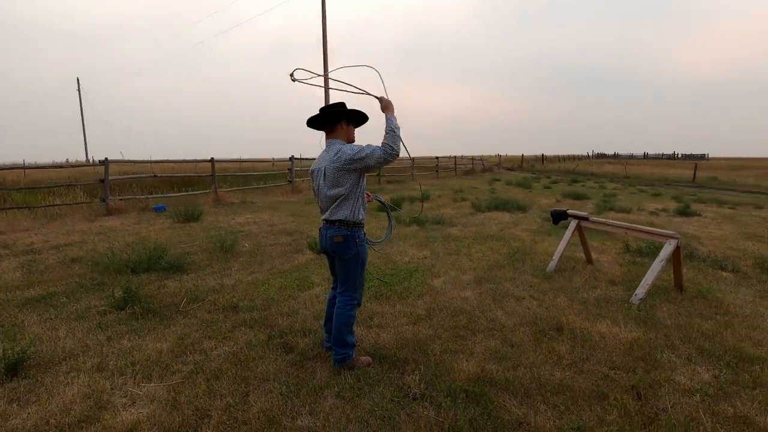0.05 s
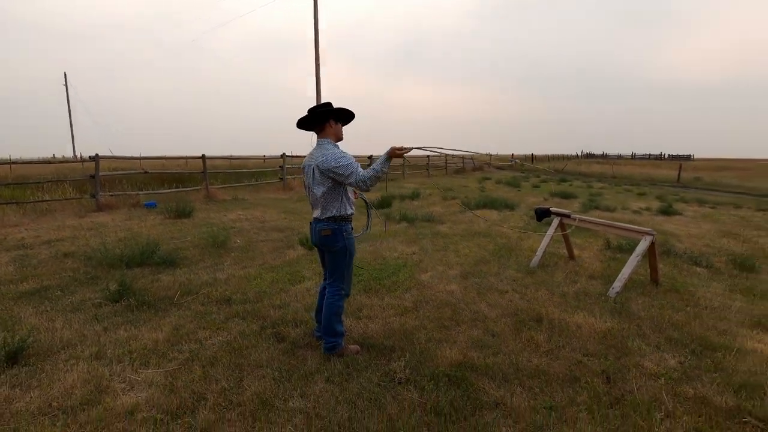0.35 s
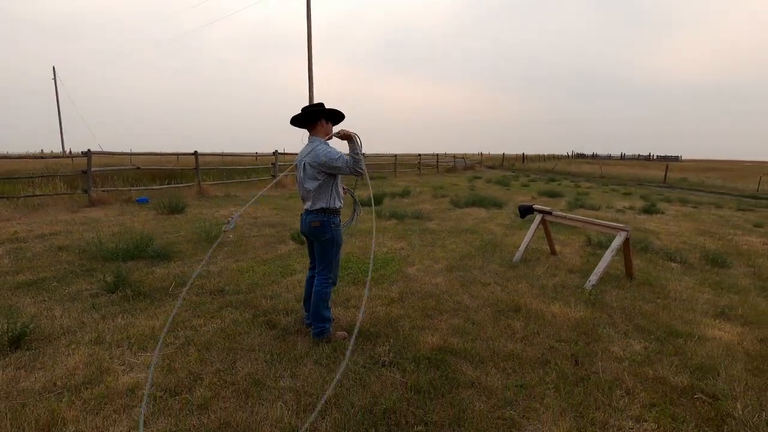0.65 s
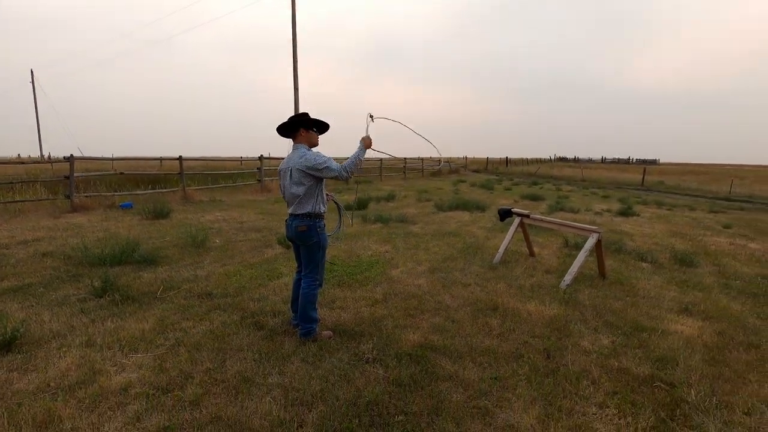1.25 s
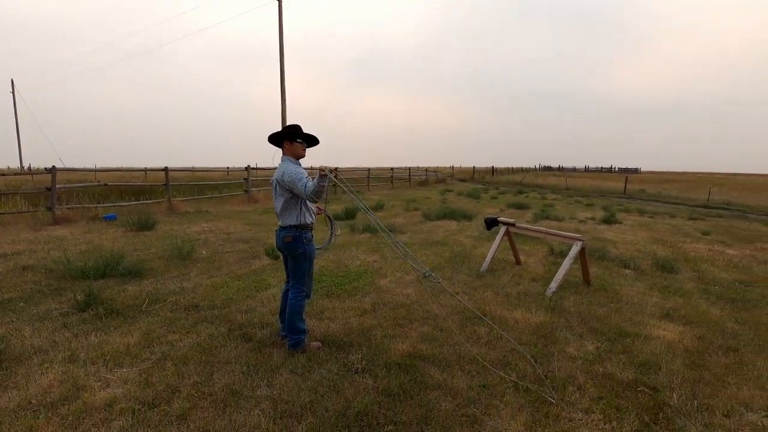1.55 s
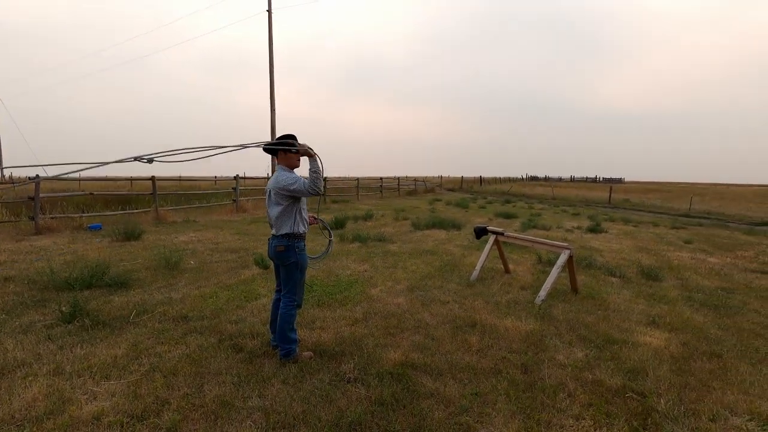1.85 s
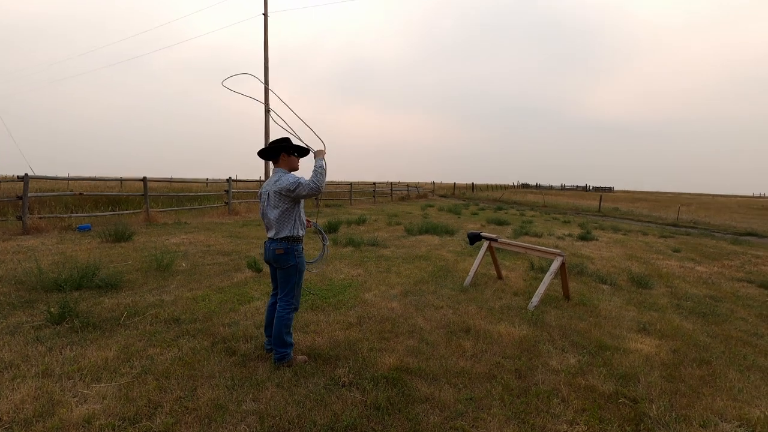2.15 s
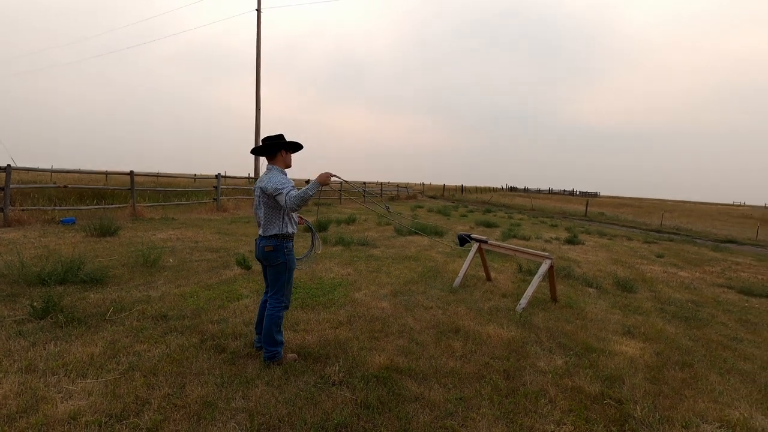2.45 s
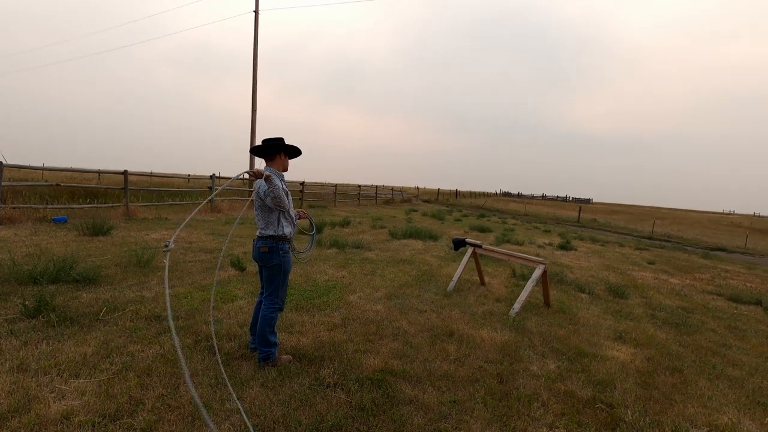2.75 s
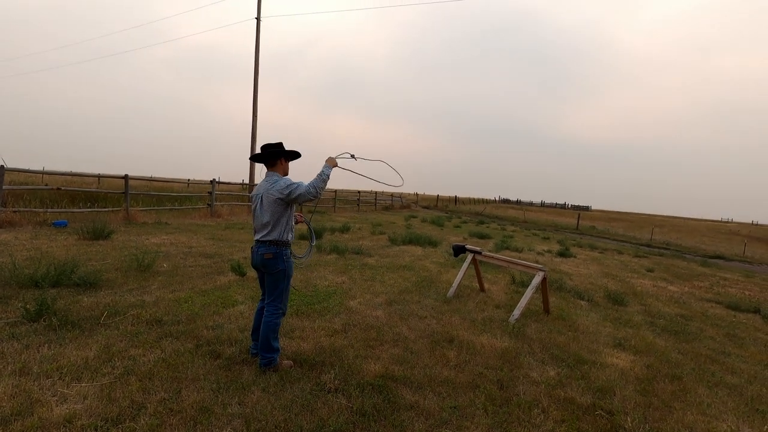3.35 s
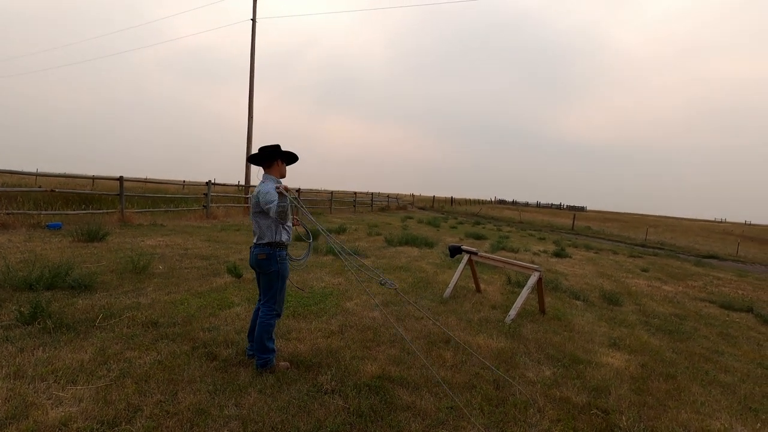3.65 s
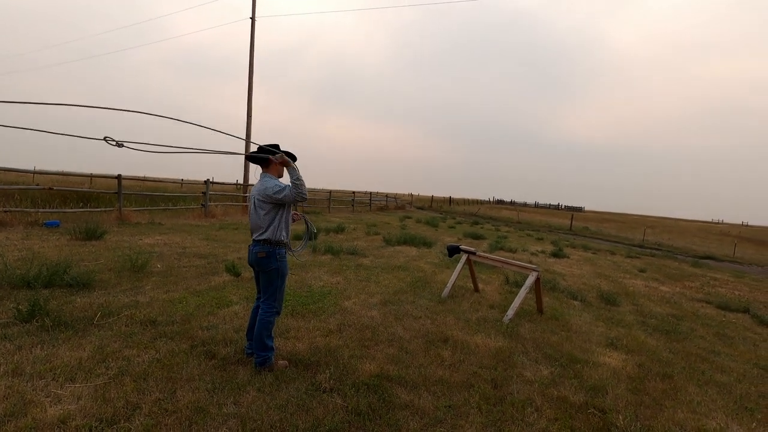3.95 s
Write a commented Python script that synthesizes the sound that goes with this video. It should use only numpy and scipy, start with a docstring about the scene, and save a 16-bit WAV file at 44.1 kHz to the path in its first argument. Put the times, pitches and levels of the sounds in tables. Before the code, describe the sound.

A lasso whooshes round in circles, brushing dry grass twice, with wind on the microphone.

```python
"""Lasso over a dry field

A lasso swings in wide circles a few metres from a small stereo microphone. Its strands hum as they shed
vortices and hiss through the air, the loop twice sweeps the grass, and the rope ticks, rubs and crackles
in the hand. Wind rumbles and buffets on the two microphone ports, over a faint field hiss."""
import sys
import numpy as np
from scipy import signal
from scipy.fft import rfft, irfft
from scipy.io import wavfile
from scipy.ndimage import uniform_filter1d

SR = 44100
rng = np.random.default_rng(int(sys.argv[2]) if len(sys.argv) > 2 else 0)


def transcribe(signal):
    """Save signal, clipped to [-1, 1], as a 16-bit WAV file at the path in sys.argv[1]."""
    frames = np.atleast_2d(signal).T
    limited = np.clip(frames, -1, 1)
    pcm = np.round(limited * 32767).astype(np.int16)
    wavfile.write(sys.argv[1], SR, pcm)


N = 176400
T = np.arange(N) / SR
F = np.maximum(np.arange(N // 2 + 1) * SR / N, 1)


def undb(db):
    """Decibels to gain."""
    return 10 ** (np.asarray(db) / 20)


def unit(x):
    """Scale to rms 1."""
    return x / np.sqrt(np.mean(x ** 2))


def curve(rows, column=1):
    """One column of a table, joined by straight lines in time."""
    rows = np.array(rows)
    return np.interp(T, rows[:, 0], rows[:, column])


def colour(x, rows, column=1):
    """Equalise a sound through (Hz, dB) points."""
    rows = np.array(rows)
    gain_db = np.interp(np.log(F), np.log(rows[:, 0]), rows[:, column])
    return irfft(rfft(x) * undb(gain_db), N)


def pair(x, likeness):
    """Mix two unrelated sounds into a left and right that are partly alike."""
    mid = np.sqrt(1 + likeness) * x[0]
    side = np.sqrt(1 - likeness) * x[1]
    return np.array([mid + side, mid - side]) / np.sqrt(2)


def noise(likeness):
    """White stereo noise."""
    return pair(rng.standard_normal((2, N)), likeness)


def place(x, pan_db, lag_s=4e-5):
    """The left port hears the sound pan_db louder and a little later than the right."""
    left, right = x * undb([[pan_db / 2], [-pan_db / 2]])
    return np.array([irfft(rfft(left) * np.exp(-2j * np.pi * F * lag_s), N), right])


def steady(x, seconds):
    """Even out the slow chance swells of a noise."""
    return x / np.sqrt(uniform_filter1d(abs(x) ** 2, int(seconds * SR)) + 1e-12)


def whistle(hz, width_hz):
    """A tone of wandering phase and strength around a pitch; at 0 Hz, a random wobble."""
    real, imag = irfft(rfft(rng.standard_normal((2, N))) / np.sqrt(1 + (F / width_hz) ** 4), N)
    wander = steady(real + 1j * imag, seconds=0.08)
    phase = 2 * np.pi * np.cumsum(np.broadcast_to(hz, N)) / SR
    return np.sqrt(2) * (wander * np.exp(1j * phase)).real


def grains(per_s, spread_db):
    """Two unrelated streams of tiny clicks of uneven size."""
    hits = rng.random((2, N)) < per_s / SR
    clicks = hits * rng.standard_normal((2, N))
    return unit(clicks * undb(spread_db * np.minimum(rng.exponential(size=(2, N)), 5)))


def field():
    """Distant open air, a fine high hiss and a faint fluttering buzz, like an insect's."""
    # Tone of the air and of the hiss. Each row: frequency in Hz, gain in dB.
    air_colour = [(100, 9.5), (300, 18), (500, 6.5), (800, -0.5), (1200, 4.5), (1800, -15.5), (3000, -22),
                  (6000, -17.5), (10000, -17), (15000, -30.5)]
    hiss_colour = [(1000, -31), (3000, -4), (5000, 5.5), (7400, 5.5), (8300, 3.5), (9500, 2.5),
                   (11000, -1.5), (12500, -7.5), (14000, -12.5)]
    # Swells of the hiss and of the buzz. Each row: time in seconds, level in dB.
    hiss_level = [(0, -79), (.3, -76), (.38, -80), (.6, -79), (1.12, -71.5), (1.3, -80), (1.6, -79),
                  (2.1, -77.5), (2.4, -80), (2.9, -77), (3.1, -92), (4, -95.5)]
    buzz_level = [(1.2, -88.5), (2.3, -82), (2.66, -78), (2.71, -102)]
    air = unit(colour(noise(likeness=0.53), air_colour)) * undb(-69)
    hiss = unit(colour(noise(likeness=0.17), hiss_colour)) * undb(curve(hiss_level))
    throb = 1 + 0.27 * whistle(hz=71, width_hz=71)
    buzz = pair([whistle(hz=11800, width_hz=1150) for _ in range(2)], likeness=0.3)
    return air + place(hiss, pan_db=1) + buzz * throb * undb(curve(buzz_level))


def wind(flutter_db=2):
    """Turbulence rumbles on each port by itself, and flutters on both together."""
    # Swells of the wind. Each row: time in seconds, left and right level in dB.
    swells = [(0, -16.5, -44), (.2, -65, -21.5), (.32, -20.5, -30.5), (.43, -32, -30.5), (.58, -27.5, -24),
              (.71, -33.5, -38), (.9, -23, -28.5), (1.15, -34.5, -27.5), (1.28, -35, -37),
              (1.4, -29.5, -48), (1.58, -39, -33.5), (1.72, -37.5, -34), (1.93, -28.5, -44),
              (2.02, -40.5, -42), (2.12, -42.5, -38), (2.3, -34, -30), (2.4, -49.5, -48),
              (2.66, -40.5, -46.5), (2.77, -28, -50), (2.84, -36.5, -46), (3.0, -40.5, -57),
              (3.16, -22, -34), (3.33, -39, -42), (3.48, -24, -37), (3.72, -32, -32), (3.87, -26, -19),
              (4, -49, -41.5)]
    # Tone of the rumble. Each row: frequency in Hz, gain in dB.
    rumble_colour = [(10, -39.5), (25, -2), (42, 3), (80, -4), (125, -12.5), (180, -19.5), (260, -32),
                     (400, -48.5), (800, -93.5)]
    level_db = np.array([curve(swells, column=1), curve(swells, column=2)])
    level_db += flutter_db * whistle(hz=0, width_hz=8)
    rumble = steady(colour(noise(likeness=0), rumble_colour), seconds=0.23)
    return rumble * undb(level_db)


def eddies(size=8192):
    """Eddies strike the ports as low thuds: each a slow body around a shorter, brighter core."""
    # Buffets of wind. Each row: centre and half-width in seconds, left and right gain in dB,
    # corner in Hz. Body and core each scale the width, gains and corner.
    buffets = [(0.172, 0.0038, -12.5, -16.5, 211), (0.196, 0.0052, -10, -39, 188),
               (0.219, 0.0073, -21, -20, 347), (0.243, 0.0089, -16.5, -25, 176),
               (0.273, 0.0075, -20.5, -21, 170), (0.313, 0.024, -28.5, -21, 246),
               (0.351, 0.003, -17.5, -22, 252), (.374, 0.026, -36.5, -26.5, 237),
               (0.424, 0.012, -51, -30, 191), (0.523, 0.016, -39, -14.5, 208),
               (0.921, 0.026, -43, -19, 229), (1.05, 0.0075, -36.5, -16.5, 273.6),
               (1.084, 0.0088, -36, -15.5, 270), (1.179, 0.0062, -18, -28, 179),
               (1.407, 0.0022, -28, -29, 201), (2.098, 0.0065, -40.5, -24.5, 187.1),
               (2.305, 0.016, -36.5, -35.5, 131), (2.772, 0.0074, -22, -57, 70.57),
               (3.128, 0.0037, -13.5, -26.5, 215.1), (3.149, 0.007, -9.5, -33.5, 120),
               (3.186, 0.018, -36.5, -34, 230), (3.476, 0.006, -29.5, -27.5, 249),
               (3.532, 0.011, -20.5, -26, 152.5), (3.588, .012, -41, -25, 184),
               (3.65, 0.035, -28, -32, 137.8), (3.78, 0.022, -37, -24, 179.4),
               (3.853, 0.011, -32.5, -17, 221.2), (3.871, 0.015, -31.5, -16, 225),
               (3.92, 0.015, -21, -16, 196), (3.984, 0.013, -26, -25.5, 205)]
    out = np.zeros((2, N + 2 * size))
    t = (np.arange(size) - size // 2) / SR
    f = np.arange(size // 2 + 1) * SR / size

    def puff(half_width_s, corner_hz):
        """A bell-shaped burst of turbulence that falls away above its corner."""
        envelope = np.exp(-0.5 * (t / half_width_s) ** 2)
        burst = pair(rng.standard_normal((2, size)), likeness=0.33) * envelope
        low_cut = f / np.hypot(f, 0.24 * corner_hz)
        high_cut = np.exp(-(f / corner_hz) ** 1.79)
        thud = irfft(rfft(burst) * low_cut * high_cut)
        return thud * np.sqrt(np.sum(envelope ** 2) / np.sum(thud ** 2, axis=1, keepdims=True))

    for at, half_width_s, left_db, right_db, corner_hz in buffets:
        body = undb(-2) * puff(half_width_s, 0.78 * corner_hz)
        core = undb(-0.5) * puff(0.27 * half_width_s, 1.065 * corner_hz)
        i = int(at * SR) + size // 2
        out[:, i:i + size] += (body + core) * undb([[left_db], [right_db]])
    return out[:, size:size + N]


def squeak(at_s=0.084, half_width_s=0.026):
    """The rope slips briefly against itself."""
    envelope = np.exp(-((T - at_s) / half_width_s) ** 2)
    return place(whistle(hz=1880, width_hz=48) * envelope * undb(-63.5), pan_db=1)


def scrapes(half_band_octaves=0.71):
    """The rope slides through the hand in short, soft rubs."""
    # Rubs in the hand. Each row: centre and half-width in seconds, level in dB, band centre in Hz.
    rubs = [(.43, 0.019, -68, 2190), (1.027, 0.0075, -67.5, 1430), (1.109, .009, -60.5, 1160),
            (1.167, 0.0077, -70.5, 3310), (2.456, 0.012, -72, 1720), (3.139, 0.021, -72, 2296)]
    out = np.zeros(N)
    for at, half_width_s, db, hz in rubs:
        band = 1 / (1 + (np.log2(F / hz) / half_band_octaves) ** 4)
        friction = unit(irfft(rfft(rng.standard_normal(N)) * band, N))
        out += friction * undb(db) * np.exp(-((T - at) / half_width_s) ** 2)
    return place(out, pan_db=7)


def crackle(start_s=1.87, length_s=0.57, count=28, size=256):
    """While the loop twists, dry fibres snap one by one, each with its own pitch and strength."""
    low_hz, high_hz, decay_cycles = 2650, 13010, 1.4
    out, t = np.zeros(N), T[:size]
    for k, (jitter, pitch, softness) in enumerate(rng.random((count, 3))):
        hz = low_hz * (high_hz / low_hz) ** pitch
        snap = np.sin(2 * np.pi * hz * t) * np.exp(-t * hz / decay_cycles)
        i = int((start_s + length_s * (k + jitter) / count) * SR)
        out[i:i + size] += undb(-53 - 11 * softness) * snap
    return place(out, pan_db=16.5)


def ticks(knock_hz=786, top_hz=8000, boost_db=4, size=4096):
    """Short dry cracks in one broad resonance, over a dull knock of the stiff rope."""
    # Ticks of the rope. Each row: start in seconds, peak in dB before the boost and panning,
    # decay in seconds, resonance in Hz.
    cracks = [(.088, -53, 0.0015, 1370), (0.1951, -51, 0.0053, 790), (0.3293, -56, 0.0011, 2480),
              (0.5881, -53, 0.00063, 2900), (0.709, -59, 0.0021, 3400), (1.8178, -59.5, 0.0007, 3500),
              (2.011, -58.5, 0.00097, 2378), (2.0563, -55, 0.0008, 2300), (2.0991, -54.5, 0.0012, 2000),
              (2.1852, -55.5, 0.0017, 2460), (2.2725, -53.5, 0.00078, 1030)]
    out = np.zeros(N)
    for start, db, decay, hz in cracks:
        burst = rng.standard_normal(size) * np.exp(-T[:size] / decay)
        ring = signal.lfilter(*signal.iirpeak(hz, Q=3, fs=SR), burst)
        knock = signal.lfilter(*signal.iirpeak(knock_hz, Q=3, fs=SR), burst)
        tick = signal.lfilter(*signal.butter(1, top_hz, fs=SR), ring + undb(1) * knock)
        i = int(start * SR)
        out[i:i + size] += undb(db + boost_db) * tick / abs(tick).max()
    return place(out, pan_db=8.5)


def grass(sag_db_per_s=49, release_s=0.0096, tail_s=0.074, tail_db=-11.5):
    """The loop flicks thousands of dry stalks a second, and they settle behind it."""
    # Passes through the grass. Each row: start and hold in seconds, gain in dB, attack in seconds.
    sweeps = [(1.639, 0.035, -47.5, 0.035), (2.711, 0.053, -48, 0.017)]
    # Tone of the stalks. Each row: frequency in Hz, left and right gain in dB.
    stalk_colour = [(202.9, 3.5, 11.5), (545, -4.5, -3), (1000, -8.5, -4), (1790, -5.5, -4.5),
                    (3320, -1, 0), (5170, -3, -1.5), (6548, -7.5, -5), (7800, -5, -20), (8400, -14, -8),
                    (8700, -6, 1.5), (10060, -13, -2), (11200, -18, -6), (12900, -18, -12),
                    (15500, -26.5, -20)]
    envelope = np.zeros(N)
    for start, hold, db, attack in sweeps:
        age = np.maximum(T - start, 0)
        rise = np.minimum(age / attack, 1)
        sag_db = sag_db_per_s * np.clip(age - attack, 0, hold)
        after = np.maximum(age - attack - hold, 0)
        release = np.exp(-after / release_s) + undb(tail_db) * np.exp(-after / tail_s)
        envelope += undb(db - sag_db) * rise * release
    left, right = pair(grains(per_s=4200, spread_db=1.5), likeness=0.85)
    rustle = np.array([colour(left, stalk_colour, column=1), colour(right, stalk_colour, column=2)])
    return place(unit(rustle) * envelope, pan_db=1.5)


def rope_rush():
    """Air rushes past the rope in a broad hiss on each swing, roughened by the twisted strands."""
    # Swells of the rush. Each row: time in seconds, level in dB.
    rush_level = [(0, -65), (.08, -62.5), (.22, -69.5), (.38, -71), (.47, -66), (.57, -59), (.68, -62.5),
                  (.77, -67), (1.08, -67.5), (1.25, -72), (1.62, -70), (1.72, -59.5), (1.82, -68.5),
                  (2.02, -64), (2.2, -66), (2.4, -70.5), (2.68, -72.5), (2.82, -65.5), (2.9, -61.5),
                  (3.02, -73), (3.35, -76.5), (3.74, -74), (3.89, -61), (3.96, -68), (4, -73)]
    # Tone of the rush. Each row: frequency in Hz, gain in dB.
    rush_colour = [(200, 6.5), (500, 5.5), (800, -2), (1300, 2), (2600, -2.5), (4000, -7), (7000, -12.5),
                   (10000, -19.5), (15000, -45)]
    air = noise(likeness=0.45)
    creaks = undb(-5.5) * pair(grains(per_s=600, spread_db=4.5), likeness=0.71)
    rush = unit(colour(air + creaks, rush_colour))
    return place(rush * undb(curve(rush_level)), pan_db=2)


def rope_hum(cruise_hz=254, octave_db_per_hz=0.1054):
    """Vortices shed by the fast tip and the slower inner strands, with a weak octave from drag."""
    # The tip's speed sets the pitch of its vortices. Each row: time in seconds, pitch in Hz.
    tip_pitch = [(0, 254.7), (.14, 215), (.45, 249.8), (.6, 338.8), (.67, 316.8), (.78, 179.1),
                 (.81, 250.2), (.95, 195), (1.55, 304), (1.67, 312.5), (1.75, 215), (1.82, 152.3),
                 (1.87, 220.7), (1.99, 216.8), (2.1, 295.3), (2.26, 195.3), (2.52, 247.8), (2.66, 222),
                 (2.81, 215), (2.92, 285.4), (3.03, 240), (3.15, 285), (3.4, 214.5), (3.68, 254.9),
                 (3.85, 349), (4, 232.2)]
    # Swells of the hum. Each row: time in seconds, level in dB.
    hum_level = [(0, -44.5), (.12, -60), (.5, -61), (.61, -47.5), (.71, -46), (.78, -43), (.82, -41),
                 (.88, -47), (1.3, -82), (1.5, -71), (1.68, -52.5), (1.78, -46.5), (1.84, -54.5),
                 (1.89, -48.5), (2.0, -51.5), (2.07, -66.5), (2.2, -51.5), (2.38, -67), (2.53, -58),
                 (2.66, -60.5), (2.81, -52), (2.89, -43.5), (2.98, -46.5), (3.07, -56), (3.26, -53.5),
                 (3.34, -71), (3.65, -55), (3.83, -47.5), (4, -48)]
    hz = curve(tip_pitch)
    tip = whistle(hz, width_hz=13)
    inner = undb(-9) * whistle(0.75 * hz, width_hz=49)
    octave_db = -26.5 + octave_db_per_hz * (hz - cruise_hz)  # grows as the rope speeds up
    octave = undb(octave_db) * whistle(2 * hz, width_hz=61)
    return place((tip + inner + octave) * undb(curve(hum_level)), pan_db=0.8)


def scene():
    """The lasso in front, with the wind and the field around it."""
    lasso = rope_hum() + rope_rush() + squeak() + scrapes() + crackle() + grass() + ticks()
    return lasso + wind() + eddies() + field()


def record(dry):
    """A steep low-pass cuts the top above 15.7 kHz."""
    return signal.sosfilt(signal.ellip(8, 0.2, 70, 15700, fs=SR, output="sos"), dry)


dry = scene()
out = record(dry)
transcribe(out)
```